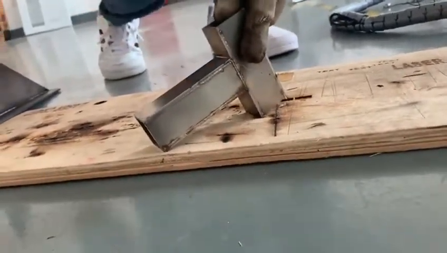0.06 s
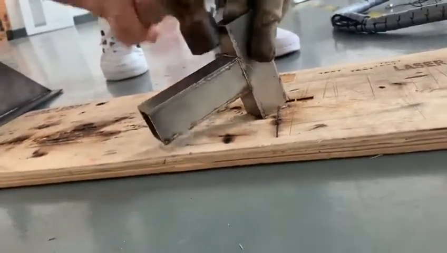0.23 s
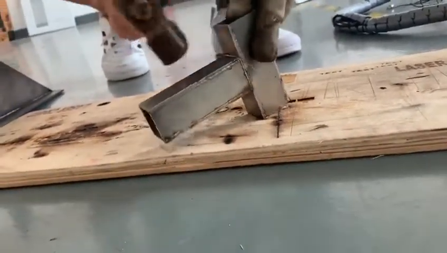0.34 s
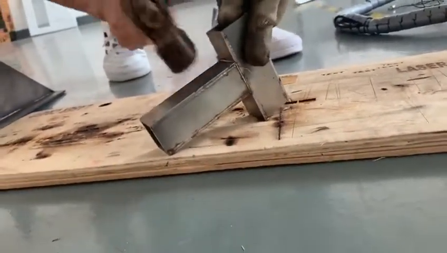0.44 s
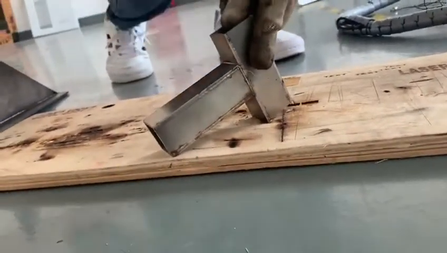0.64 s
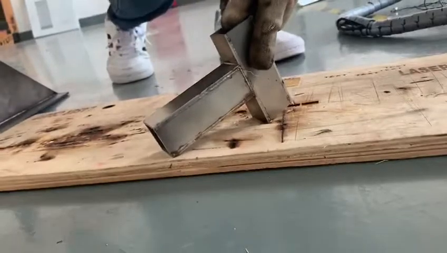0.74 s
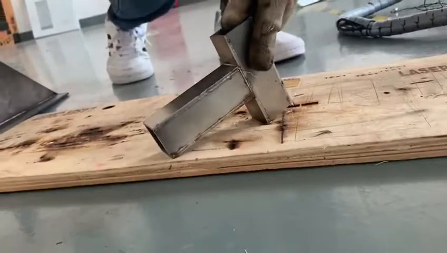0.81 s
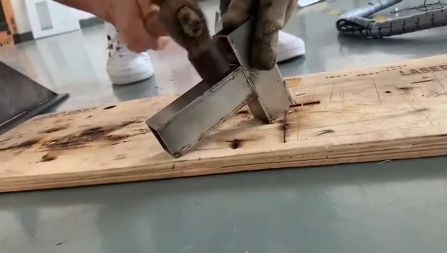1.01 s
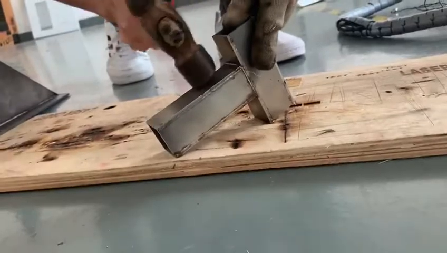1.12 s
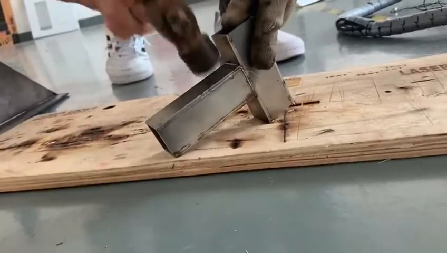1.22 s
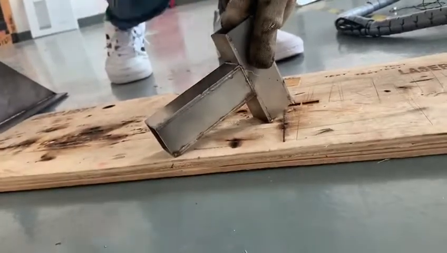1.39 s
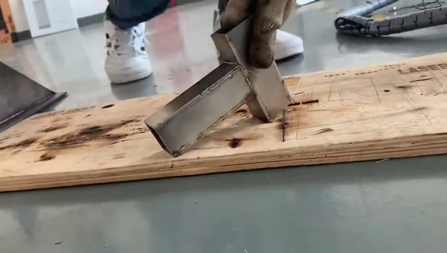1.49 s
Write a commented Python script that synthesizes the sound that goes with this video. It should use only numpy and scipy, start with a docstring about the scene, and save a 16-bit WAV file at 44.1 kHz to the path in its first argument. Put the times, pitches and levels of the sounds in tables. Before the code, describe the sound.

A hammer cracks hard on a steel tube joint at about 0.2 s, with a bright short ring and hollow knocks as the wooden plank thuds on the floor until 0.3 s. The large workshop echoes. A faint tap with a light ring comes near 0.55 s. A second hard blow lands at 0.96 s, with a weaker rebound at 1.03 s and small knocks, then echo fades over quiet machine hum.

```python
"""In a large, echoing workshop, a hand hammer strikes a welded steel tube joint that stands on a wooden plank.
Hard blows crack (bursts of noise), set a few high steel modes ringing (fading sines) and fill the hall (fading noise).
A dull noise swells up to each hard blow; the plank thuds on the floor (sagging low sines) with hollow knocks.
Machines hum far off (shaped noise). The sound is stereo; a limiter ducks the loud peaks, and the level dips briefly."""
import sys
import numpy as np
from scipy import signal
from scipy.fft import rfft, irfft
from scipy.io import wavfile

SR = 44100
rng = np.random.default_rng(int(sys.argv[2]) if len(sys.argv) > 2 else 0)


def file_out(sig):
    """Save sig as 16-bit WAV at sys.argv[1]."""
    # one column per channel
    cols = np.atleast_2d(sig).T
    # limit, then scale
    lim = np.clip(cols, -1, 1)
    pcm = np.round(lim * 32767).astype(np.int16)
    wavfile.write(sys.argv[1], SR, pcm)


N = 68355  # length of the sound in samples


def from_db(db):
    """Turn a level in dB into a gain."""
    return 10 ** (np.asarray(db) / 20)


def rms_one(x):
    """Scale a sound to an rms (average strength) of 1."""
    return x / np.sqrt(np.mean(x ** 2) + 1e-20)


def at_hz(points, hz):
    """Read a table between its points, on a logarithmic frequency axis."""
    points = np.array(points)
    return np.interp(np.log(np.maximum(hz, 1)), np.log(points[:, 0]), points[:, 1])


def coloured(spectrum, size):
    """Shape white noise with a spectrum, then scale it to rms 1."""
    hz = np.fft.rfftfreq(size, 1 / SR)
    white = rng.standard_normal(size)
    return rms_one(irfft(rfft(white) * from_db(at_hz(spectrum, hz)), size))


def since(s):
    """Time since a moment (0 before it), and whether it has passed."""
    t = np.arange(N) / SR - s
    return np.maximum(t, 0), t >= 0


# Hammer contacts: (time [s], crack level [dB], lowest ring level [dB], second ring level [dB],
# upper rings level [dB], ring time factor [-])
BLOWS = [(0.2115, 4, -11.5, -14, -20.5, 1.14), (0.548, -27.5, -62, -22.5, -34, 0.67),
         (0.964, -0.5, -13, -6.5, -29, 0.83), (1.0281, -10, -61, -41, -24, 1.15), ]
# Ringing modes of the steel:
# (frequency [Hz], relative level [dB], time to fall 60 dB before the ring time factor [s], swell time [s])
STEEL_MODES = [(7553, 0, .45, .015), (8655, 0, .35, .002), (8442, -10, .3, .002), (10770, -8, .12, .001),
               (10955, -1, .12, .001), (11285, -8, .15, .001), (11490, -3, .15, .001),
               (14590, -8, .15, .001), (15330, -14, .15, .001)]
CHOKE_DB = 3.0  # loss that each later contact adds


def rings():
    """Steel modes swell and fade as sines; each later contact chokes the earlier rings a little."""
    out = np.zeros(N)
    for s, _, low_db, second_db, upper_db, longer in BLOWS:
        t, _ = since(s)
        choke_db = sum(CHOKE_DB * since(row[0])[1] for row in BLOWS if row[0] > s)
        for k, (hz, mode_db, t60, swell_s) in enumerate(STEEL_MODES):
            blow_db = [low_db, second_db, upper_db][min(k, 2)]
            level_db = blow_db + mode_db - 60 * t / (t60 * longer) - choke_db
            swell = 1 - np.exp(-t / swell_s)
            out += from_db(level_db) * swell * np.sin(2 * np.pi * hz * t)
    return out


# Colour of the sharp crack: (frequency [Hz], relative level per Hz [dB])
CRACK_COLOUR = [(100, -34.5), (1500, 2.5), (5000, -4.5), (9000, 2.5), (13000, -1.5), (16000, -4)]
CRACK_T60_S = 0.025  # time to fall 60 dB


def cracks():
    """Steel on steel gives a sharp burst of noise that starts at once and dies fast."""
    envelope = np.zeros(N)
    for s, crack_db, *_ in BLOWS:
        t, on = since(s)
        envelope += on * from_db(crack_db - 60 * t / CRACK_T60_S)
    return envelope * coloured(CRACK_COLOUR, N)


# Dull noise, knock and hall impulse around each hard blow:
# (time [s], dull noise level [dB], hollow knock level [dB], impulse level sent to the hall [dB])
HARD_BLOWS = [(0.2087, -14.5, -5.5, 23), (0.9632, -15, -10.5, 20)]
# Colour of the dull noise before its low-pass: (frequency [Hz], relative level per Hz [dB])
DULL_COLOUR = [(100, -24), (400, -10.5), (1500, -4.5), (4000, -10.5), (8000, 1), (16000, -23)]
DULL_RISE_S, DULL_FALL_S, DULL_CUT_HZ = 0.0044, 0.0068, 4770


def dull_swells():
    """A dull noise swells for a few milliseconds up to each hard blow, then dies."""
    time = np.arange(N) / SR
    envelope = np.zeros(N)
    for s, dull_db, *_ in HARD_BLOWS:
        rise, fall = (time - s) / DULL_RISE_S, (s - time) / DULL_FALL_S
        envelope += from_db(dull_db) * np.exp(np.minimum(rise, fall))
    low_pass = signal.butter(4, DULL_CUT_HZ, fs=SR, output="sos")
    dull = signal.sosfilt(low_pass, coloured(DULL_COLOUR, N))
    return envelope * rms_one(dull)


# Plank thuds on the floor: (time [s], thud level [dB], starting pitch [Hz], hollow knock level [dB])
THUDS = [(0.203, -15, 43, -10.5), (0.228, -7, 38.9, -32), (0.257, -9.5, 31.48, -17.5),
         (0.297, -5.5, 102.6, -12), (0.468, -30, 70, -23.5), (0.561, -31.5, 72, -23),
         (0.973, -16, 51.2, -26), (0.986, -47, 90, -13.5), (1.075, -34, 76.4, -18.5), (1.122, -29, 71, -20)]
THUD_CYCLES, THUD_SAG = 4.15, 0.1  # cycles of the starting pitch in a 60 dB fall; strength of the sag


def thuds():
    """The plank thuds on the floor: short, low sines that sag in pitch."""
    low = np.zeros(N)
    for s, db, hz, _ in THUDS:
        t, _ = since(s)
        cycles = np.log1p(THUD_SAG * hz * t) / THUD_SAG  # pitch falls as hz / (1 + sag * hz * t)
        low -= from_db(db - 60 * t * hz / THUD_CYCLES) * np.sin(2 * np.pi * cycles)
    return low


# Hollow modes of tube and plank: (frequency [Hz], relative level [dB], time to fall 60 dB [s])
BODY_MODES = [(325.4, -3.5, 0.06), (455, -18, 0.032), (574, 1, 0.04), (633.3, 0, 0.089),
              (787.6, -6.5, 0.086), (1291, -3, 0.053), (1553, 0, 0.045), (1766, 7, 0.01)]


def knocks():
    """Thuds and hard blows set the hollow modes ringing, each mode with a random strength of its own."""
    hits = [(s, knock_db) for s, _, _, knock_db in THUDS]
    hits += [(s, knock_db) for s, _, knock_db, _ in HARD_BLOWS]
    luck_db = rng.normal(0, 2, (len(hits), len(BODY_MODES)))
    out = np.zeros(N)
    for (s, db), row in zip(hits, luck_db):
        t, _ = since(s)
        for k, ((hz, mode_db, t60), own_db) in enumerate(zip(BODY_MODES, row)):
            sign = (-1) ** k  # neighbouring modes start in opposite directions
            out += sign * from_db(db + mode_db + own_db - 60 * t / t60) * np.sin(2 * np.pi * hz * t)
    return out / np.sqrt(len(BODY_MODES))


# Stereo phase table: how far each frequency is turned in the right channel, in steps in the treble:
# (frequency [Hz], phase [radians])
STEREO_PHASE = [(60, 0), (400, .1), (2200, 2.2), (4000, .3), (7600, -.5), (8200, 0), (9100, 3.1),
                (10300, 3.2), (10900, 6.2), (12300, 6.3), (12800, 9.4), (14000, 9.5), (14600, 12.5),
                (16000, 12.6)]


def right_channel(x):
    """The same sound in the right channel: each frequency is turned in phase, its level unchanged."""
    turn = at_hz(STEREO_PHASE, np.fft.rfftfreq(2 * N, 1 / SR))
    return irfft(rfft(x, 2 * N) * np.exp(1j * turn), 2 * N)[:N]


# How alike the two channels are in spread-out sound: (frequency [Hz], shared part of the power [0-1])
LIKENESS = [(60, 0.73), (300, 1), (800, 0.29), (2000, 0), (6000, 0), (7800, 0.59), (9000, 1), (16000, 0.82)]
# Fading of the hall before the decay rate factor: (frequency [Hz], time to fall 60 dB [s])
HALL_T60 = [(60, 0.89), (160, 1.21), (420, 0.87), (1100, 1.217), (2900, 1.12), (7700, 0.83), (11500, 0.42),
            (15000, 0.17)]


def diffuse(spectrum, decay_rate):
    """Sound from all sides: third-octave noise bands, partly shared by the channels; a rate of 0 is steady."""
    t = np.arange(N) / SR
    edges = 25 * 2 ** np.arange(0, 9.5, 1 / 3)
    white = rng.standard_normal((2, 3, N))  # two sets of (shared, left, right)
    shared, own = 0, 0
    for k, (low, high) in enumerate(zip(edges, edges[1:])):
        band_pass = signal.butter(2, [low, high], "band", fs=SR, output="sos")
        band = signal.sosfilt(band_pass, white[k % 2])  # neighbouring bands use different noise
        hz = np.sqrt(low * high)
        alike = np.clip(at_hz(LIKENESS, hz), 0, 1)
        gain = from_db(at_hz(spectrum, hz) - decay_rate * 60 * t / at_hz(HALL_T60, hz))
        shared = shared + gain * np.sqrt(alike) * band[0]
        own = own + gain * np.sqrt(1 - alike) * band[1:]
    return own + [shared, right_channel(shared)]


def strikes():
    """A single-sample impulse for each hard blow, as the hall hears it."""
    out = np.zeros(N)
    for s, _, _, hall_db in HARD_BLOWS:
        out[int(s * SR)] = from_db(hall_db)
    return out


# Colour of the hall's echo: (frequency [Hz], relative level [dB])
HALL_COLOUR = [(40, -12), (120, 2), (350, -3.5), (650, 1), (1000, 5.5), (1500, -1), (2600, -0.5),
               (4500, -2), (6500, -10), (9600, -1.5), (12500, -1), (16000, -9)]
HALL_DB, HALL_BUILD_S = -2.5, 0.012


def hall(x):
    """Many reflections act like noise that builds up within a moment and dies band by band."""
    build = 1 - np.exp(-np.arange(N) / SR / HALL_BUILD_S)
    echo = diffuse(HALL_COLOUR, decay_rate=0.93) * build
    echo = echo / np.sqrt(np.sum(echo ** 2) / 2)  # unit energy per channel, on average
    return from_db(HALL_DB) * signal.fftconvolve(echo, x[None], axes=1)[:, :N]


# Colour of the far machines: (frequency [Hz], relative level per Hz [dB])
SHOP_COLOUR = [(18, -41), (30, -7), (124, -7), (569, -12.5), (649, -7), (1040, -16), (1540, -13),
               (2900, -18.5), (3310, -22), (5740, -32), (16000, -64)]
SHOP_DB = -42
HUM_HZ, HUM_WIDTH_HZ, HUM_DB = 114.3, 8, -46.5


def shop():
    """Far machines: steady noise, and a wavering hum from noise through a narrow resonance."""
    radius, angle = np.exp(-np.pi * HUM_WIDTH_HZ / SR), 2 * np.pi * HUM_HZ / SR
    resonance = [1, -2 * radius * np.cos(angle), radius * radius]
    # the first half is dropped, so the hum is already going
    hum = signal.lfilter([1, 0, -1], resonance, rng.standard_normal(2 * N))[N:]
    noise = diffuse(SHOP_COLOUR, decay_rate=0)
    return from_db(SHOP_DB) * rms_one(noise) + from_db(HUM_DB) * rms_one(hum)


RING_TO_HALL_DB, KNOCK_TO_HALL_DB = -17.5, -3
DIP_FROM_S, DIP_TO_S, DIP_DB = .757, .95, -2.5


def scene():
    """Add the direct sound in both channels, its echo and the shop; the whole level dips briefly."""
    ring, low, knock = rings(), thuds(), knocks()
    direct = ring + cracks() + dull_swells() + knock
    to_hall = strikes() + from_db(KNOCK_TO_HALL_DB) * knock + from_db(RING_TO_HALL_DB) * ring
    sound = low + [direct, right_channel(direct)] + hall(to_hall) + shop()
    in_dip = since(DIP_FROM_S)[1] * ~since(DIP_TO_S)[1]
    return sound * from_db(DIP_DB * in_dip)


LIMIT_DB, RELEASE_DB_PER_S, LIMIT_ATTACK_S = -2.5, 437.5, 0.00033
TOP_STOP_HZ = 16300  # from here up, the sound is cut by at least 60 dB


def record(dry):
    """A limiter ducks on peaks and lets go quickly; soft clipping rounds the rest and the top is cut."""
    t = np.arange(N) / SR
    # the limiter's level sensing mostly ignores the bass
    high_pass = signal.butter(2, 300, "high", fs=SR, output="sos")
    peak = np.abs(signal.sosfilt(high_pass, dry)).max(axis=0)
    over_db = np.maximum(20 * np.log10(peak + 1e-9) - LIMIT_DB, 0)
    # hold each peak, letting go by a fixed number of dB per second
    release_db = RELEASE_DB_PER_S * t
    held_db = np.maximum.accumulate(over_db + release_db) - release_db
    # look slightly ahead, then smooth the ducking
    ahead = int(LIMIT_ATTACK_S * SR)
    early_db = np.pad(held_db[ahead:], (0, ahead))
    r = np.exp(-1 / (LIMIT_ATTACK_S * SR))
    duck_db = signal.lfilter([1 - r], [1, -r], early_db)
    limited = dry * from_db(-duck_db)
    clipped = .8 * np.tanh(limited / .8)
    return signal.sosfilt(signal.cheby2(12, 60, TOP_STOP_HZ, fs=SR, output="sos"), clipped)


dry = scene()
out = record(dry)
file_out(out)
```